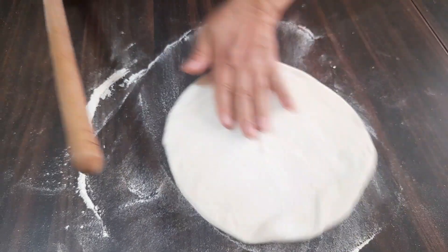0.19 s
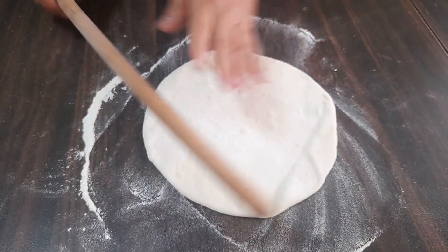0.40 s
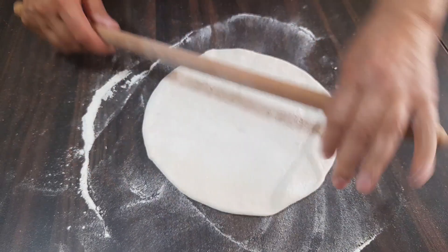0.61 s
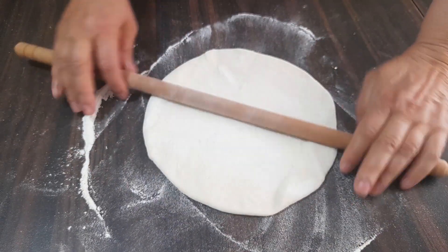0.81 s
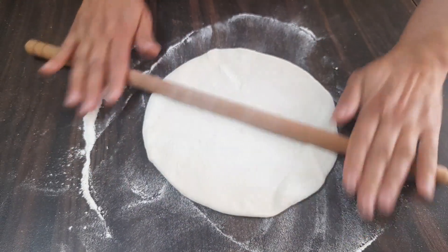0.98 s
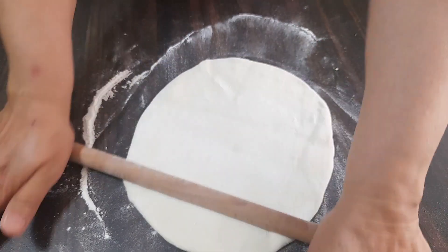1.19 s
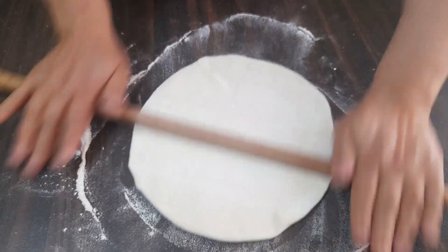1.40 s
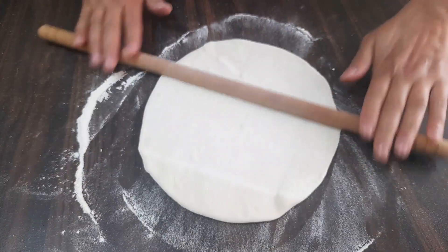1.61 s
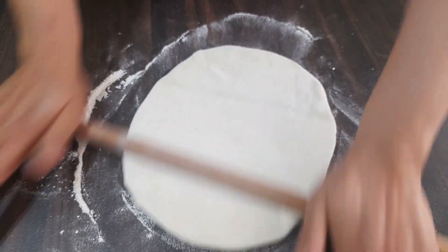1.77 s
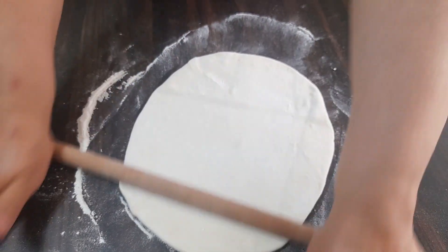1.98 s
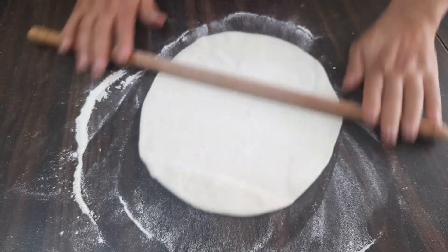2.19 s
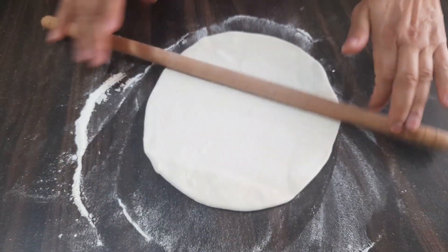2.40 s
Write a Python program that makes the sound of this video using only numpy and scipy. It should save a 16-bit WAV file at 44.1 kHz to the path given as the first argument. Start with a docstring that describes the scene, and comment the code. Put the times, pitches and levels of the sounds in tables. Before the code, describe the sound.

A wooden rolling pin rubs over floured dough after a dry dough slide, with soft counter thuds

```python
"""Dough hisses on a floured counter, then a wooden pin rubs and rumbles over it, with thumps and knocks.
Sliding and rolling are flickering noise in narrow bands; crushed flour adds a fine crackle to the hiss.
A thin, high whistle at the start is a wavering tone with a noisy fringe; uneven pressure makes the rumble.
Short pushes make the counter ring; snaps and crackles make the pin and counter ring.
A small kitchen answers the blows and clacks, over a quiet room tone."""
import sys
import numpy as np
from scipy import signal
from scipy.io import wavfile

SR = 44100
rng = np.random.default_rng(int(sys.argv[2]) if len(sys.argv) > 2 else 0)


def output_pcm(signal):
    """Save a mono or channel-first signal as 16-bit PCM at the path in sys.argv[1].

    Samples are clipped to [-1, 1] before scaling.
    """
    pcm = np.clip(np.atleast_2d(signal).T, -1, 1) * 32767
    wavfile.write(sys.argv[1], SR, np.round(pcm).astype(np.int16))


N = 114660  # length in samples, 2.6 s

# the ways the counter rings: (f/Hz, level/dB, time to fall by 60 dB/s)
COUNTER_MODES = [(48.3, -12.5, 0.85), (92, -5, 0.12), (120.76, -0.5, 0.34), (164, -16, 0.55),
                 (185.3, -13.5, 0.25), (254, -1, 0.026), (319, -10, 0.2), (416, -10, 0.017),
                 (570.4, -11.5, 0.19), (632, -14, 0.08), (748, -24, 0.18), (1054, -10, 0.045),
                 (1197, -24.5, 0.12)]


def sliding_dough():
    """Dough turned on flour: friction gives a low rub and a bright hiss, each with its own loudness curve."""
    # strength of the slide before the trims below: (t/s, rub level/dB, hiss level/dB)
    strokes = [(0, -40, -47), (.05, -41, -50), (.114, -49.5, -57), (.205, -56, -71), (.24, -46, -48.5),
               (.31, -44, -47.5), (.37, -49.5, -43.5), (.44, -44.5, -46.5), (.55, -55, -61.5),
               (.62, -56, -77)]
    # colour of the rub, in relative noise density: (f/Hz, level/dB)
    rub_colour = [(180, -8), (300, 8.5), (365, -3.5), (424, -12), (458, -4), (1040, -4.5), (1130, -4),
                  (2020, -2.5), (4000, -21), (5200, -44), (8800, -120)]
    # colour of the hiss, in relative noise density: (f/Hz, level/dB)
    hiss_colour = [(2200, 12.5), (2800, -3.5), (4000, 2.5), (5760, 0), (8420, -7), (12300, -1.5),
                   (16000, -8.5)]
    rub_trim_db, hiss_trim_db = -3.5, -2
    rub_gain, hiss_gain = gains(strokes)
    rub = rub_gain * from_db(rub_trim_db) * rubbing(rub_colour)
    hiss_noise = banded_noise(hiss_colour, patchy_db=0.65, flicker_hz=25) + flour()
    return rub + hiss_gain * from_db(hiss_trim_db) * hiss_noise


def rolling_pin():
    """Wood rubs along the palms and over the floured dough, louder and softer with each stroke."""
    # strength of the strokes before the trims below: (t/s, rub level/dB, hiss level/dB)
    strokes = [(.62, -70.5, -79), (.74, -62.5, -78), (.765, -64, -64.5), (.87, -68, -67), (1.0, -62, -67),
               (1.12, -69, -73), (1.23, -60.5, -60.5), (1.35, -58.5, -61), (1.47, -73.5, -81.5),
               (1.55, -58.5, -59.5), (1.625, -55, -54.5), (1.70, -57, -57.5), (1.77, -67.5, -71.5),
               (1.89, -59, -58.5), (1.98, -53, -55.5), (2.06, -57, -64), (2.17, -68, -71),
               (2.275, -55, -55.5), (2.325, -54, -56.5), (2.36, -56.5, -58), (2.395, -56, -52),
               (2.45, -56, -56), (2.49, -58, -62.5), (2.6, -65, -68)]
    # colour of the rub, in relative noise density: (f/Hz, level/dB)
    rub_colour = [(180, -15), (300, -21), (393, 2), (505, -2.5), (999, -8.5), (1790, -3.5), (2000, -8),
                  (2480, 0.5), (2920, -41), (4000, -7), (5200, -16), (8800, -120)]
    # colour of the hiss, in relative noise density: (f/Hz, level/dB)
    hiss_colour = [(2200, -14), (2800, 16), (3500, 4), (4600, 10.5), (5800, 6.5), (8100, 5), (12200, 8),
                   (14500, 5), (16000, -7)]
    rub_trim_db, hiss_trim_db = 4, 3
    rub_gain, hiss_gain = gains(strokes)
    rub = rub_gain * from_db(rub_trim_db) * rubbing(rub_colour)
    hiss_noise = banded_noise(hiss_colour, patchy_db=1.24, flicker_hz=29.6) + flour()
    return rub + hiss_gain * from_db(hiss_trim_db) * hiss_noise


def rubbing(colour):
    """Uneven friction that also makes the counter ring softly; rms about 1."""
    counter_ring_db = -20
    rub = banded_noise(colour, patchy_db=0.7, flicker_hz=29.8)
    return rub + from_db(counter_ring_db) * rms_one(ring(rub, COUNTER_MODES))


def flour():
    """Tiny grains of flour crushed and dragged: random clicks of mixed size make a fine bright crackle."""
    grains_per_s, size_spread_db, level_db = 1100, 5, -23
    signs = rng.choice([-1, 1], (2, N))
    sizes = from_db(size_spread_db * np.minimum(rng.exponential(1, (2, N)), 5))
    grains = signs * sizes * (rng.random((2, N)) < grains_per_s / SR)
    # the tiny offset keeps the filter off exact silence
    return from_db(level_db) * rms_one(band(grains + 1e-18, 1900, 22500))


def whistle():
    """A thin, wavering high whistle near 11.9 kHz with a noisy fringe, fading out within 0.4 s."""
    # loudness curve of the whistle: (t/s, level/dB)
    loudness = [(0, -53), (.06, -51), (.14, -55), (.2, -63), (.27, -53), (.31, -57), (.36, -70)]
    pitch_hz, waver_hz, flutter_db = 11885, 32, 3
    fringe_width_hz, fringe_db = 350, -2  # width of each of the two resonances
    tone = np.sin(2 * np.pi * np.cumsum(pitch_hz + waver_hz * drift(23)) / SR)
    flutter = from_db(flutter_db * np.array([drift(40), drift(40)]))
    fringe = resonance(rng.standard_normal((2, N)), pitch_hz, fringe_width_hz)
    fringe = resonance(fringe, pitch_hz, fringe_width_hz)
    return gains(loudness)[0] * (rms_one(tone * flutter) + from_db(fringe_db) * rms_one(fringe))


def rumble():
    """Uneven pressure shakes the counter and makes it ring."""
    # weight of the work on the counter, before the trims below: (t/s, level/dB)
    weight = [(0, -51.5), (.2, -57.5), (.44, -47.5), (.6, -63), (.9, -54.5), (1.27, -51), (1.5, -54),
              (1.65, -36.5), (1.78, -50), (1.92, -42.5), (2.05, -45), (2.19, -51.5), (2.33, -42.5),
              (2.5, -41), (2.6, -48.5)]
    # colour of the shaking, in relative noise density: (f/Hz, level/dB)
    colour = [(42, -1.5), (80, 2), (120, -5), (150, -0.5), (220, -11.5), (380, -9.5), (520, -31),
              (900, -16)]
    shake_db, ring_db = -3, -8.5
    shake = banded_noise(colour, patchy_db=2.5, flicker_hz=7.9)
    counter = rms_one(ring(shake, COUNTER_MODES))
    return gains(weight)[0] * (from_db(shake_db) * shake + from_db(ring_db) * counter)


def blows():
    """Each blow is a short push that makes the counter ring: soft ones thud, hard ones knock."""
    # pushes, a low centre being soft and a high one hard; the width is that of each of two resonances:
    # (t/s, strength/dB, centre f/Hz, width/Hz)
    pushes = [(0.2331, -17, 104, 139), (0.269, -23.5, 136, 140), (.975, -26.5, 95, 120),
              (1.008, -42.5, 116, 130), (1.265, -43.5, 91, 100), (1.543, -35, 174, 417),
              (1.628, -26.5, 75, 98), (1.689, -59, 99, 150), (1.897, -36, 94, 100),
              (1.951, -22.5, 271, 400), (2.0407, -25.5, 454, 1350), (2.329, -27, 77, 92),
              (2.366, -31.5, 90, 120), (2.42, -39.5, 132, 198), (2.488, -31.5, 154, 262)]
    room_db, left_minus_right_db = -7, -2
    force = 0
    for start_s, strength_db, hz, width_hz in pushes:
        push = from_db(strength_db) * signal.unit_impulse(N, int(start_s * SR))
        force = force + resonance(resonance(push, hz, width_hz), hz, width_hz)
    body = ring(force, COUNTER_MODES)
    return pan(left_minus_right_db) * (body + from_db(room_db) * kitchen(body))


def clacks():
    """Each contact is a snap and a dying crackle that make the pin and the counter ring."""
    # slaps of dough and clacks of the pin, before the left-right balance:
    # (t/s, strength/dB, low edge f/Hz, high edge f/Hz, time for the crackle to fall by 60 dB/s)
    contacts = [(.237, -42.5, 450, 840, 0.064), (.2375, -50.5, 2030, 7700, 0.027),
                (0.2772, -38, 1310, 2640, 0.015), (.664, -74, 3300, 6070, 0.023),
                (.714, -67.5, 3300, 6140, 0.02), (.979, -48.5, 610, 846, .2),
                (1.545, -52.5, 390, 990, 0.048), (1.628, -53, 3000, 14100, 0.029),
                (1.953, -46.5, 1420, 3570, 0.069), (2.0414, -47, 800, 2400, 0.036),
                (2.2999, -46.5, 1350, 2730, 0.01), (2.487, -52.5, 1190, 4100, .025)]
    # the ways the pin rings: (f/Hz, level/dB, time to fall by 60 dB/s)
    pin_modes = [(1560, -5, .11), (1756, -14, .12), (1997, -19, .12), (2350, -22, .09)]
    snap_db = 8.5  # the first snap over the start of the crackle, before filtering
    pin_db, counter_db, room_db, left_minus_right_db = -38, -37, -1, -4.5
    cracks = np.zeros(N + SR)
    t = np.arange(SR // 4) / SR
    for start_s, strength_db, low_hz, high_hz, t60_s in contacts:
        burst = rng.choice([-1, 1], len(t)) * from_db(-60 * t / t60_s)
        burst[0] = from_db(snap_db)
        crack = band(band(burst, low_hz, high_hz), low_hz, high_hz)
        # the strength is the level if all the energy is spread over 10 ms
        crack = crack / np.sqrt(np.sum(crack ** 2) / (.01 * SR))
        start = int(start_s * SR)
        cracks[start:start + len(t)] += from_db(strength_db) * crack
    cracks = cracks[:N]
    pin = from_db(pin_db) * ring(cracks, pin_modes)
    counter = from_db(counter_db) * ring(cracks, COUNTER_MODES)
    wood = cracks + pin + counter
    return pan(left_minus_right_db) * (wood + from_db(room_db) * kitchen(wood))


def kitchen(x):
    """Reflections of a small room: a dying noise tail, different at each microphone."""
    t60_s, low_hz, top_hz = 0.68, 212, 5660
    t = np.arange(SR // 2) / SR
    noise = band(rng.standard_normal((2, len(t))), low_hz, top_hz)
    tail = noise * from_db(-60 * t / t60_s) * (t > .004)  # reflections start after 4 ms
    # sets the average power gain inside the band to about 1
    tail *= np.sqrt(2 * (top_hz - low_hz) / SR / np.sum(tail ** 2, axis=1, keepdims=True))
    return signal.fftconvolve(x[None], tail, axes=1)[:, :N]


def room_tone():
    """The quiet of the kitchen: a steady bed of mostly low noise that flickers slowly."""
    # colour of the quiet room, in relative noise density: (f/Hz, level/dB)
    colour = [(30, -40), (55, -1), (100, 3), (185, 2.5), (340, 0), (450, -5), (774, -5.5), (1130, -9.5),
              (2280, -23), (4610, -24), (8400, -55), (14700, -33), (16000, -40)]
    level_db = -57.5
    return from_db(level_db) * banded_noise(colour, patchy_db=2.5, flicker_hz=7)


def banded_noise(colour, patchy_db, flicker_hz):
    """Stereo noise in narrow bands whose levels flicker partly together; rms 1."""
    # how alike the two microphones hear a pitch: (f/Hz, left-right correlation from -1 to 1)
    likeness = [(60, 1), (150, 0.84), (300, 0.65), (600, .5), (1400, -0.07), (2600, 0.23), (5000, -0.27),
                (10000, 0)]
    # balance of the two microphones: (f/Hz, left minus right level/dB)
    balance = [(60, -2), (300, -3), (700, 1.5), (1500, -6), (2800, -3), (5500, -2.5), (9000, 0.5),
               (15000, -0.5)]
    low_hz, high_hz = colour[0][0], colour[-1][0]
    edges = np.geomspace(low_hz, high_hz, int(2.7 * np.log2(high_hz / low_hz)) + 2)
    white = rng.standard_normal((2, 2, N))  # neighbouring bands take turns between two noises
    together = drift(flicker_hz)
    out = 0
    for k, (low_hz, high_hz) in enumerate(zip(edges, edges[1:])):
        mid, side = band(white[k % 2], low_hz, high_hz)
        hz = np.sqrt(low_hz * high_hz)
        alike = np.clip(at_hz(likeness, hz), -1, 1)
        flicker_db = patchy_db * (together + drift(flicker_hz))
        gain = from_db(at_hz(colour, hz) + flicker_db) * pan(at_hz(balance, hz))
        # mid is shared by both sides, side has opposite signs
        stereo = np.sqrt(1 + alike) * mid + np.sqrt(1 - alike) * side * [[1], [-1]]
        out = out + gain * stereo
    return rms_one(out)


def ring(force, modes):
    """A body rings in several modes, each a dying sine driven by the force."""
    out = 0
    for hz, level_db, t60_s in modes:
        decay = from_db(-60 / (t60_s * SR))  # per sample
        turn = 2 * np.pi * hz / SR  # radians per sample
        feedback = [1, -2 * decay * np.cos(turn), decay * decay]
        out = out + from_db(level_db) * signal.lfilter([0, np.sin(turn)], feedback, force + 1e-18)
    return out


def resonance(x, hz, width_hz):
    """Two-pole resonance that favours one pitch, with gain 1 at its peak."""
    return signal.lfilter(*signal.iirpeak(hz, hz / width_hz, fs=SR), x + 1e-18)


def band(x, low_hz, high_hz):
    """Keep the sound between two frequencies (Butterworth band-pass)."""
    edges = [low_hz, min(high_hz, .48 * SR)]
    return signal.sosfilt(signal.butter(2, edges, "band", fs=SR, output="sos"), x)


def drift(rate_hz):
    """Slow random wander of spread 1: smoothed noise made at every 40th sample."""
    step = 40
    r = np.exp(-2 * np.pi * step * rate_hz / SR)
    noise = rng.standard_normal(N // step + 2002)
    slow = signal.lfilter([1], [1, -2 * r, r * r], noise)[2000:]  # drop the filter's start
    return np.interp(np.arange(N) / step, np.arange(len(slow)), rms_one(slow))


def gains(rows):
    """Each dB column of a curve as a gain in time, fading away outside its span."""
    times, *columns = np.transpose(rows)
    t = np.arange(N) / SR
    outside_s = np.maximum(0, np.maximum(times[0] - t, t - times[-1]))
    fade = np.exp(-outside_s / .02)
    return [from_db(np.interp(t, times, column)) * fade for column in columns]


def at_hz(points, hz):
    """Read a table between its points on a log-frequency axis, as pitch is heard."""
    table_hz, values = np.array(points).T
    return np.interp(np.log(hz), np.log(table_hz), values)


def pan(db):
    """Left and right gains for a left-minus-right level difference."""
    return from_db(np.array([[db], [-db]]) / 2)


def from_db(db):
    """Decibels to gain."""
    return 10 ** (np.asarray(db) / 20)


def rms_one(x):
    """Scale to rms 1."""
    return x / np.sqrt(np.mean(x ** 2) + 1e-20)


def scene():
    """Work at the counter over the quiet kitchen; the rubbing reaches the left microphone a little later."""
    left_lag_s = .00027
    left, right = sliding_dough() + rolling_pin()
    left = np.pad(left, (int(left_lag_s * SR), 0))[:N]
    friction = np.array([left, right])
    return friction + whistle() + rumble() + blows() + clacks() + room_tone()


def record(dry):
    """The deepest bass is rolled off and the top is cut steeply."""
    low_cut_hz, top_cut_hz = 44.4, 15900
    dry = signal.sosfilt(signal.butter(4, low_cut_hz, "high", fs=SR, output="sos"), dry)
    return signal.sosfilt(signal.ellip(12, .1, 90, top_cut_hz, fs=SR, output="sos"), dry)


dry = scene()
out = record(dry)
output_pcm(out)
```